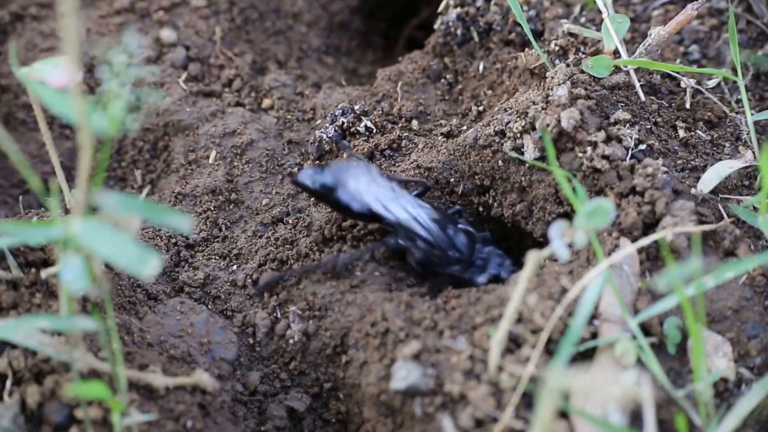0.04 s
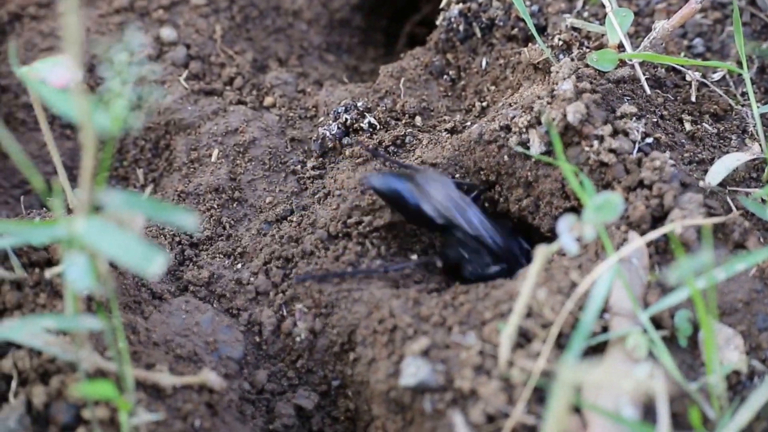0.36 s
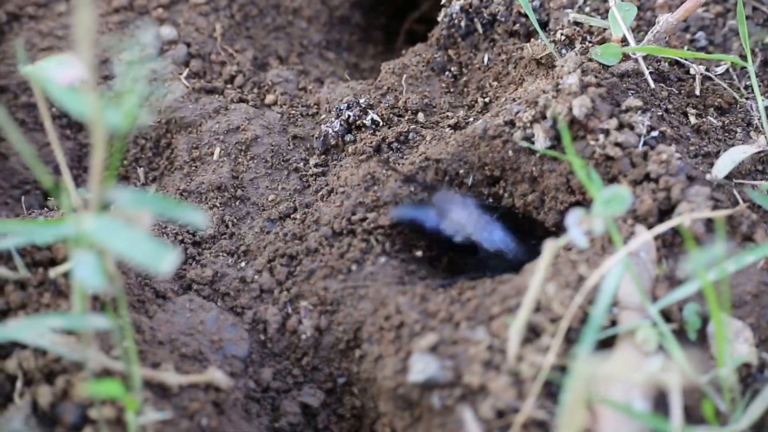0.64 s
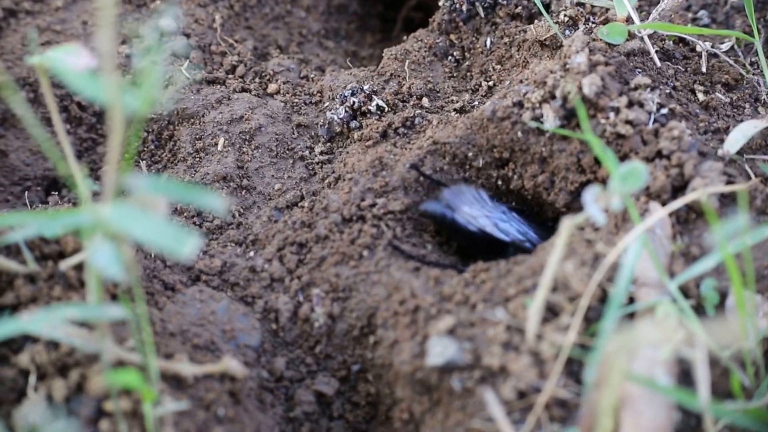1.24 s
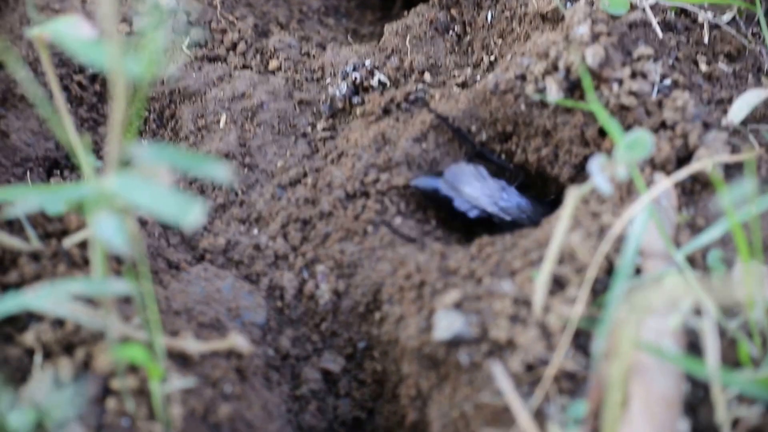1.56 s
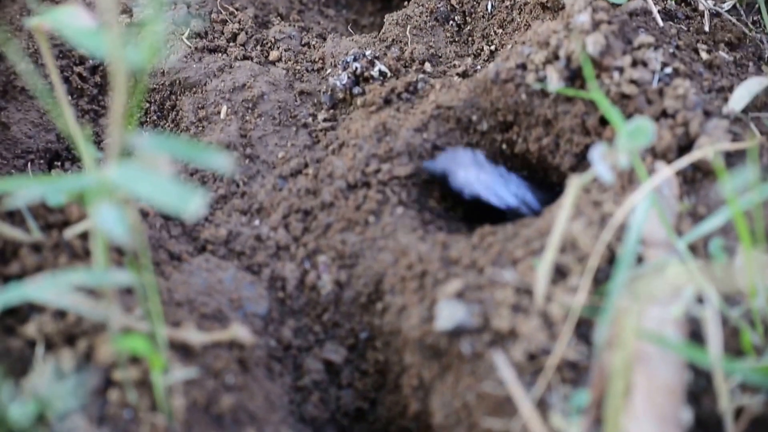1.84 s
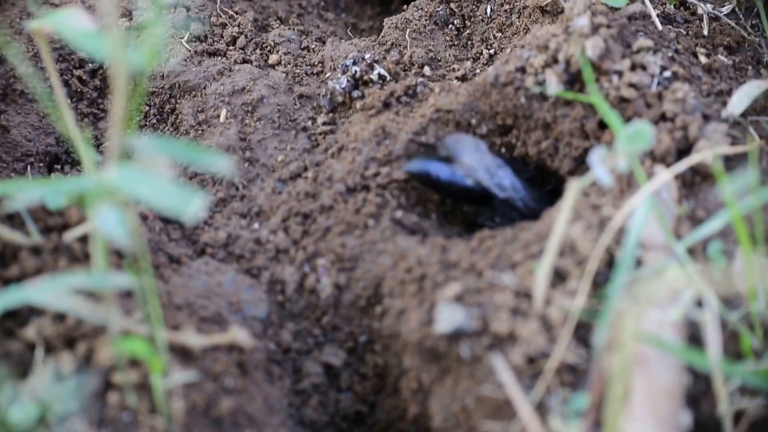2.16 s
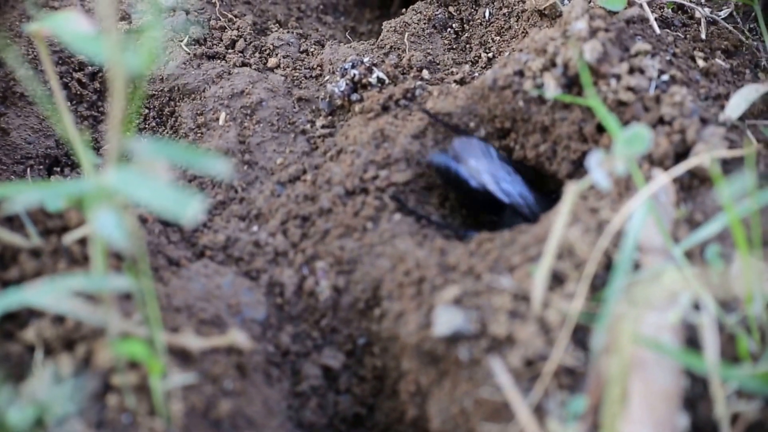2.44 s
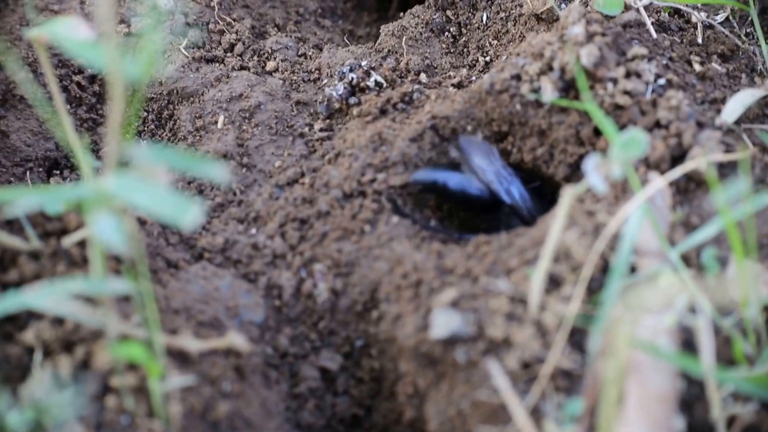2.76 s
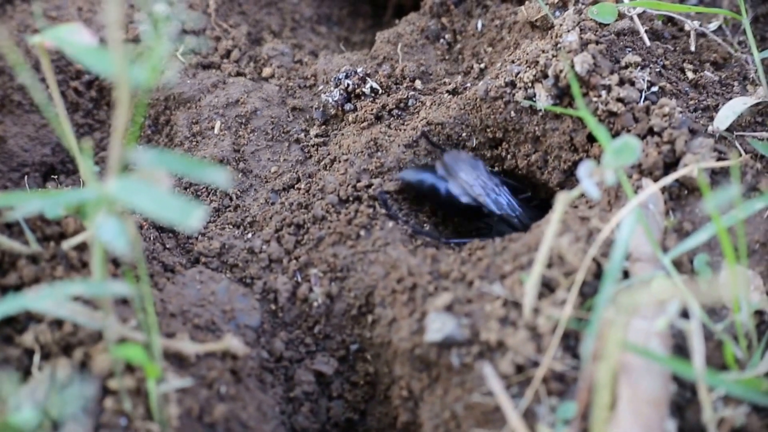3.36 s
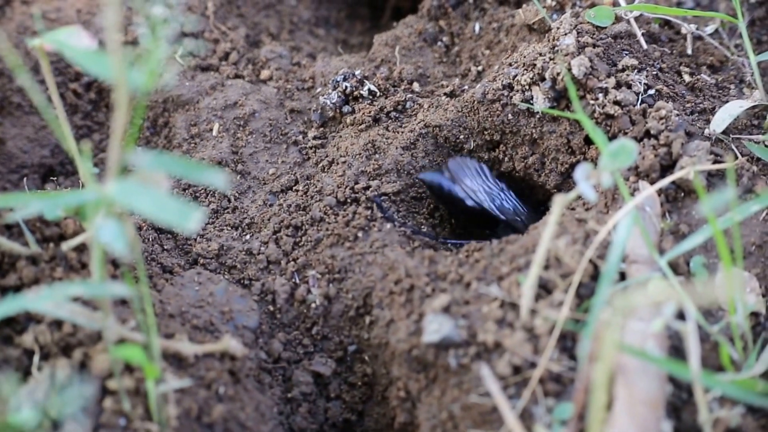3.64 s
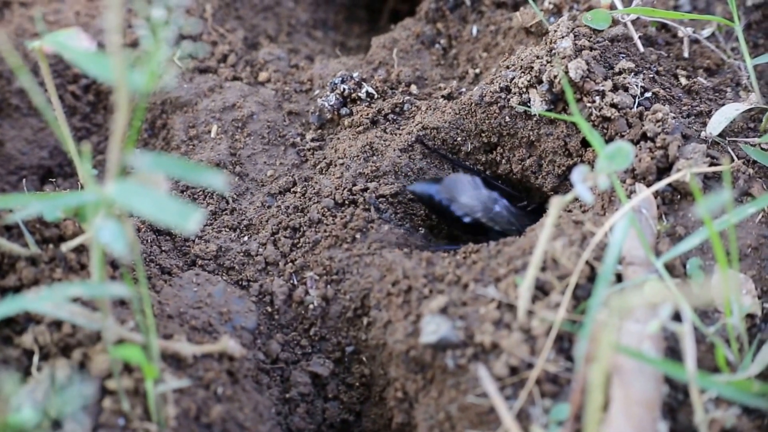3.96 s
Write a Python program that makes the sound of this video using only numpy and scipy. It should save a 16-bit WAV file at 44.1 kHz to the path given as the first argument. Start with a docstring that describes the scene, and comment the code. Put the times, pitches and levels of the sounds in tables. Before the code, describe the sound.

A wasp digs close by in short raspy buzzing pulses, about ten a second, from 1.1 seconds until the end at 4. Each dips in pitch, with lighter buzzing in some gaps. Before that there is only faint outdoor rumble and hiss, and a soil tick at 0.5. A soft microphone bump comes near 1.9, then a distant roar and rustle grow, with three faint chirps after 3.7.

```python
"""A bed of distant rumble, faint hum and airy hiss; a grain of soil drops. From 1.1 s a digger wasp, close
by, loosens earth at its burrow. Its flight muscles shake its jaws against the soil, one click a cycle;
each push loads the muscles, so the buzz sags in pitch as it swells and sharpens, and in some the return
stroke strikes too. A light buzz fills some gaps. Near 1.9 s a low bump hits the microphone; then a far
roar and a rustle grow behind the digging, and three faint chirps come just before the end."""
import sys
import numpy as np
from scipy import signal
from scipy.fft import rfft, irfft
from scipy.io import wavfile
from scipy.ndimage import uniform_filter1d

SR = 44100
rng = np.random.default_rng(int(sys.argv[2]) if len(sys.argv) > 2 else 0)


def wrap_up_sound(samples):
    """Save the sound to the file named by the first command line argument, as 16-bit audio."""
    columns = np.atleast_2d(samples).T
    # keep every value between -1 and 1, then stretch to whole-number steps
    tamed = np.clip(columns, -1, 1)
    steps = np.round(tamed * 32767).astype(np.int16)
    wavfile.write(sys.argv[1], SR, steps)


N = 176400

# Tone colours of the four noise beds. Each row: frequency in Hz, relative level in dB.
RUMBLE_TONE = [(20, -10), (40, -14), (65, -8.5), (95, -1), (125, 0), (180, -2), (260, -7), (370, -10),
               (520, -20), (800, -22.5), (1500, -41)]
HISS_TONE = [(300, -1.5), (1000, 0), (2300, 1.5), (3400, -4), (5000, -5), (6800, -7), (9000, -14.5),
             (12000, -20.5), (14500, -46), (16000, -38)]
ROAR_TONE = [(150, -15), (260, 1.5), (400, 3), (600, -1.5), (800, -6.5), (1200, -10), (2500, -34.5)]
RUSTLE_TONE = [(900, -17), (1500, 7), (2200, 10.5), (2800, -16), (5000, -20.5)]
# Fader moves for those beds. Each row: time in seconds, level in dB.
RUMBLE_FADER = [(0, -38.5), (1.2, -39), (1.9, -37.5), (2.6, -38.5), (4, -39.5)]
HISS_FADER = [(0, -43.3), (.25, -43.5), (.45, -45), (4, -43.5)]
ROAR_FADER = [(0, -54.5), (1.2, -54), (1.9, -49.5), (2.35, -44.5), (3.0, -40), (3.3, -46.5), (3.6, -43),
              (4, -44.5)]
RUSTLE_FADER = [(0, -100), (2.0, -73), (2.8, -48), (3.35, -45.5), (4, -43.5)]
# Faint low hums, probably far traffic, and a brief 403 Hz tone near 2.3 s, probably the wasp's own free
# buzz. Each row: pitch in Hz, crest time in seconds, seconds from there to 3 dB down, crest level in dB.
HUMS = [(118, 2.8, 1.6, -46.5), (243, 3.92, .15, -39), (360, 3.3, 1., -51), (403, 2.33, .06, -43),
        (565, 3.05, .2, -53)]
# Falling soil. Each row: time in seconds, strength of the hit in dB.
CRUMB_HITS = [(.5453, -6.5)]
# The wasp's pushes. Each row: start and end in seconds, first and slowest stroke rate in Hz, share of
# the push at which it is slowest (capped at 0.95), level in dB, upper resonance boost in dB, edge trim
# in dB, edge peak in Hz, return stroke in dB against the main stroke at full contact.
JAW_PUSHES = [(1.099, 1.147, 398, 358, 1, -4, 1, -7, 8600, -26),
              (1.219, 1.26, 394, 323.6, 0.62, -1.5, -1.5, -3, 8000, -18),
              (1.327, 1.394, 376, 276, 0.64, -3, 0.5, -1, 8060, -0.5),
              (1.59, 1.616, 400, 331.4, 0.9, -2.5, -3, -7, 8100, -18),
              (1.641, 1.687, 394, 350, 0.78, -9.5, -1.5, -11, 8100, -18),
              (1.724, 1.751, 450, 303, 0.73, -1.5, -2.5, -3, 9200, -20),
              (1.801, 1.851, 375.4, 270.7, 0.65, -3, 1, 4, 9800, -11),
              (1.89, 1.917, 405, 286.3, 0.84, -2.5, 3, 3.5, 10400, -14),
              (1.957, 2.014, 351.6, 254.7, 0.79, -2.5, 2, 2, 9900, -6),
              (2.07, 2.139, 356, 259, 0.62, -2, 1, 0, 8500, -4.5),
              (2.302, 2.334, 396, 360, 0.61, -4.5, -8.5, -10, 9000, -22),
              (2.383, 2.42, 383.5, 268, 0.67, -0.5, 1, -0.5, 10100, -16),
              (2.47, 2.538, 367, 261, 0.43, 2.5, -2, -4, 9800, -14),
              (2.586, 2.627, 311, 269, 0.89, 4.5, -2.5, -6, 10300, -15),
              (2.669, 2.731, 363.7, 231, 0.63, 0, -1, -2, 9100, -7.5),
              (2.858, 2.892, 374.4, 307, 0.89, -2, -2.5, -6.5, 10000, -21),
              (2.933, 2.979, 316, 240.6, 0.77, 2.5, -1, -2.5, 9900, -16),
              (3.012, 3.06, 309.5, 251, 0.64, 3.5, -3.5, -4.5, 9800, -14),
              (3.086, 3.149, 317.3, 238, 0.76, 1.5, -1, -2, 10300, -10),
              (3.174, 3.217, 311, 249.8, 0.78, 1, 1, -1, 10700, -6.5),
              (3.25, 3.312, 327, 227.5, 0.63, 0, -2, -1.5, 9000, -4.5),
              (3.44, 3.482, 354, 288, 0.54, -3.5, 3.5, -3.5, 9150, -14),
              (3.529, 3.583, 295.7, 241, 0.72, 0.5, 2.5, 0.5, 9800, -13.5),
              (3.606, 3.644, 323, 263.7, 0.79, 2.5, 2, -2, 9850, -23),
              (3.687, 3.746, 318, 243, 0.83, 2, 3, -0.5, 11100, -16),
              (3.794, 3.852, 307, 256.3, 0.68, 3.5, -1.5, -4.5, 11400, -16),
              (3.949, 3.996, 350, 264, 0.82, -4, 4.5, 1, 10600, -14)]
# Ring of wasp and soil, and the contact's sharp edge. Each row: frequency in Hz, gain in dB.
BODY_TONE = [(300, -23), (700, -11), (1100, -13), (1350, -6), (1600, 1.5), (2000, 4), (2400, 2),
             (2900, 5.5), (3400, 2.5), (4000, -13), (5000, -46), (7000, -28.5), (15000, -60)]
EDGE_TONE = [(1500, -6.5), (4000, 5), (5500, -2.5), (6800, -5.5), (8200, -5.5), (10500, -8), (12500, -9),
             (14000, -9), (16000, -16)]
# Light buzz between pushes. Each row: start and end in seconds, stroke rate in Hz, level in dB.
IDLE_BUZZES = [(1.57, 1.81, 371, -17.5), (1.91, 2.076, 381, -19.5), (2.33, 2.46, 363, -16),
               (2.53, 2.60, 360, -18.5), (2.97, 3.26, 365, -21.5), (3.47, 3.858, 361, -15.5)]
# Tone colour of the microphone bump. Each row: frequency in Hz, relative level in dB.
BUMP_TONE = [(15, -5), (35, 5), (70, 5), (110, 9.5), (180, -12), (400, -60)]
# Far chirps. Each row: start in seconds, length in seconds, starting pitch in Hz, peak level in dB.
FAR_CHIRPS = [(3.742, .036, 4500, -46), (3.772, .025, 3450, -44), (3.932, .026, 4280, -46)]

LEAD_S, TRAIL_S = .006, .0048  # the jaws touch this long before and after a push
FREE_HZ, REBOUND = 431, .433  # unloaded stroke rate; share of the way back to it as a push ends
UPPER_HZ, UPPER_WIDTH_HZ = 3000, 1130  # the upper resonance, whose strength varies from push to push
EDGE_DB, EDGE_PEAK_DB, EDGE_WIDTH_HZ = -15.5, 11, 3050  # the edge's base gain and broad treble peak
EDGE_GLIDE, EDGE_WANDER = .27, .093  # shares by which that peak climbs in a push and strays per stroke
BITE_FROM, BITE_FULL = .3, .6  # contact at which the edge sets in, and at which it is fully sharp
RETURN_PHASE, RETURN_EDGE_DB, RETURN_EDGE_HZ = .455, 1, 7900  # return stroke: place in the cycle, edge


def undb(db):
    """Decibels to gain."""
    return 10 ** (np.asarray(db) / 20)


def spectrum_db(tone, size):
    """A (Hz, dB) tone colour on the bins of a transform."""
    hz, db = np.array(tone).T
    return np.interp(np.log(np.fft.rfftfreq(size, 1 / SR) + 1), np.log(hz), db)


def noise(tone):
    """Coloured noise of rms 1."""
    x = irfft(rfft(rng.standard_normal(N)) * undb(spectrum_db(tone, N)), N)
    return x / x.std()


def drift(rate_hz):
    """Smooth random modulation with a spread of 1."""
    hold = int(SR / rate_hz)
    steps = np.repeat(rng.standard_normal(N // hold + 1), hold)
    x = uniform_filter1d(uniform_filter1d(steps, hold), hold)[:N]
    return x / x.std()


def clicks(times, gains, size=N, half_width=8):
    """Band-limited clicks at exact times."""
    at = times[:, None] * SR
    index = at.astype(int) + np.arange(1 - half_width, half_width + 1)
    shape = np.sinc(index - at) * np.sinc((index - at) / half_width)
    return np.bincount(np.maximum(index, 0).ravel(), (shape * gains[:, None]).ravel(), size)[:size]


def ring(x, tone, boost_db=0, size=1024):
    """Ring x through a minimum-phase EQ: the tone colour plus boost_db."""
    cepstrum = irfft(np.log(undb(spectrum_db(tone, size) + boost_db)))
    cepstrum[1:size // 2] *= 2
    cepstrum[size // 2 + 1:] = 0
    return signal.oaconvolve(x, irfft(np.exp(rfft(cepstrum))))[:len(x)]


def bell(hz, width_hz, size=1024):
    """An EQ bell of height 1 on the bins of a transform."""
    return np.exp(-((np.fft.rfftfreq(size, 1 / SR) - hz) / width_hz) ** 2)


def bed(tone, fader, sway_db, sway_hz):
    """Coloured noise that rides its fader and sways a little in level."""
    level_db = np.interp(np.arange(N) / SR, *np.array(fader).T)
    return noise(tone) * undb(level_db + sway_db * drift(sway_hz))


def outdoors():
    """Distant rumble, steady hiss, a far roar that swells and a light rustle that fades in."""
    rumble = bed(RUMBLE_TONE, RUMBLE_FADER, sway_db=.51, sway_hz=6.34)
    hiss = bed(HISS_TONE, HISS_FADER, sway_db=.44, sway_hz=3.3)
    roar = bed(ROAR_TONE, ROAR_FADER, sway_db=.27, sway_hz=8.44)
    rustle = bed(RUSTLE_TONE, RUSTLE_FADER, sway_db=1.1, sway_hz=20)
    return rumble + hiss + roar + rustle


def hums(waver=.00903, sway_db=3):
    """Faint wavering tones that come and go: probably far traffic and, at 403 Hz, the wasp's free buzz."""
    t, out = np.arange(N) / SR, np.zeros(N)
    for hz, crest_s, width_s, db in HUMS:
        phase = np.cumsum(hz * (1 + waver * drift(12))) / SR
        level = undb(db + sway_db * drift(8.2)) / np.hypot(1, (t - crest_s) / width_s)
        out += level * np.sin(2 * np.pi * phase)
    return out


def crumb(ring_hz=1990, decay_s=.0004):
    """A falling grain of soil gives one dead tick."""
    times, db = np.array(CRUMB_HITS).T
    t = np.arange(N // 500) / SR
    tick = -.22 * np.sin(2 * np.pi * ring_hz * t) * np.exp(-t / decay_s)
    return signal.fftconvolve(clicks(times, undb(db)), tick)[:N]


def strokes(t, hz, jitter=.01):
    """Slightly uneven muscle strokes at a moving rate: times, periods and two random values for each."""
    phase = np.cumsum(hz) / SR
    count = np.arange(int(phase[-1]) + 1)
    chance = rng.standard_normal(size=(256, 3))[count].T
    times = np.interp(count + jitter * chance[0], phase, t)
    return times, 1 / np.interp(times, t, hz), chance[1:]


def contact(t, start, end, first_touch=.64, settle_s=.008, attack_share=.68, release_s=.012):
    """How firmly the jaws meet the soil in a push, 0-1: a first touch, a swell and a quick release."""
    touch = np.clip((t - start + LEAD_S) / (2 * LEAD_S + settle_s), 0, 1)
    swell = np.sin(np.pi / 2 * np.clip((t - start) / (attack_share * (end - start)), 0, 1))
    release = np.clip((end + TRAIL_S - t) / release_s, 0, 1)
    return touch * (first_touch + (1 - first_touch) * swell) * release


def sharp_edge(at, gain, peak_hz, size, taps=256):
    """The bite of one stroke: a very short click with a broad treble peak."""
    click = clicks(np.array([at]), np.array([gain]), size)
    return ring(click, EDGE_TONE, EDGE_PEAK_DB * bell(peak_hz, EDGE_WIDTH_HZ, taps), taps)


def push(start, end, first_hz, slow_hz, slowest_at, db, upper_db, edge_db, edge_hz, return_db, size=4096):
    """The stroke rate sags under load and rebounds; each stroke rings, sharper as the jaws bite in."""
    t = np.arange(0, LEAD_S + end - start + TRAIL_S, 1 / SR)
    progress = np.clip((t - LEAD_S) / (end - start), 0, 1)
    slowest_at = min(slowest_at, .95)
    sag = (first_hz - slow_hz) * (1 - progress / slowest_at) ** 2
    rebound = REBOUND * (FREE_HZ - slow_hz) * np.abs((progress - slowest_at) / (1 - slowest_at)) ** 3
    rate_hz = slow_hz + np.where(progress < slowest_at, sag, rebound)
    times, period, (force_scatter, peak_scatter) = strokes(t, rate_hz)
    grip = contact(times + start - LEAD_S, start, end)
    blow = grip * undb(db + 1.18 * force_scatter)
    bite = np.clip((grip - BITE_FROM) / (BITE_FULL - BITE_FROM), 0, 1)
    edge_gain = bite * undb(db + EDGE_DB + edge_db + .8 * force_scatter)
    climb = EDGE_GLIDE * (np.interp(times, t, progress) - .5)
    peak_hz = edge_hz * (1 + climb + EDGE_WANDER * peak_scatter)
    return_times = times + RETURN_PHASE * period
    return_share = grip ** 2 * undb(return_db)
    hits = clicks(times, blow, size) + clicks(return_times, blow * return_share, size)
    body = ring(hits, BODY_TONE, upper_db * bell(UPPER_HZ, UPPER_WIDTH_HZ))
    edges = sum(sharp_edge(*stroke, size) for stroke in zip(times, edge_gain, peak_hz))
    return_hits = clicks(return_times, edge_gain * return_share * undb(RETURN_EDGE_DB), size)
    return_edges = ring(return_hits, EDGE_TONE, EDGE_PEAK_DB * bell(RETURN_EDGE_HZ, EDGE_WIDTH_HZ))
    return np.pad(body + edges + return_edges, (int((start - LEAD_S) * SR), N))[:N]


def idling():
    """Faster, much weaker strokes while the jaws barely touch, ducked under each push."""
    t, out = np.arange(N) / SR, np.zeros(N)
    waver = 1 + .05 * drift(25)
    for start, end, hz, db in IDLE_BUZZES:
        on = (t > start) & (t < end)
        times, _, (force_scatter, _) = strokes(t[on], hz * waver[on])
        duck = np.clip(1 - 2 * sum(contact(times, *row[:2]) for row in JAW_PUSHES), 0, 1)
        out += clicks(times, duck * undb(db + 1.1 * force_scatter))
    return ring(out, BODY_TONE)


def wasp(wet_db=-16, rise_s=.00079, decay_s=.005):
    """Pushes and light buzzing; the burrow walls scatter a short tail."""
    direct = sum(push(*row) for row in JAW_PUSHES) + idling()
    t = np.arange(N // 50) / SR
    tail = rng.standard_normal(len(t)) * np.exp(-t / decay_s) * np.minimum(t / rise_s, 1)
    return direct + undb(wet_db) * signal.fftconvolve(direct, tail / np.linalg.norm(tail))[:N]


def bump(peak_s=1.853, db=-27, rise_s=.028, fall_s=.055):
    """A short low buffet on the microphone."""
    t = np.arange(N) / SR - peak_s
    return undb(db) * noise(BUMP_TONE) * np.exp(-np.maximum(-t / rise_s, t / fall_s))


def chirps(rise_hz_per_s=4400):
    """Thin, blurred rising notes, probably a far bird."""
    out = np.zeros(N)
    waver = 1 + .024 * drift(700)
    for start, length, hz, db in FAR_CHIRPS:
        t = np.clip(np.arange(N) / SR - start, 0, length)
        phase = np.cumsum((hz + rise_hz_per_s * t) * waver) / SR
        out += undb(db) * np.sin(np.pi * t / length) * np.sin(2 * np.pi * phase)
    return out


def scene():
    """The wasp up front and its surroundings behind, mixed in mono."""
    return (wasp() + crumb() + chirps() + outdoors() + hums() + bump())[None]


def record(dry, top_hz=15850):
    """The recorder cuts the top with a steep low-pass."""
    return signal.sosfilt(signal.ellip(10, .1, 80, top_hz, fs=SR, output="sos"), dry)


dry = scene()
out = record(dry)
wrap_up_sound(out)
```